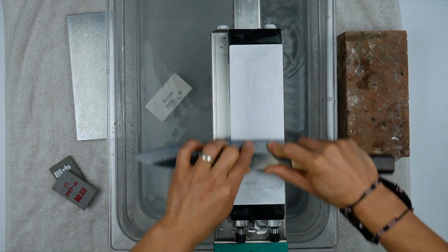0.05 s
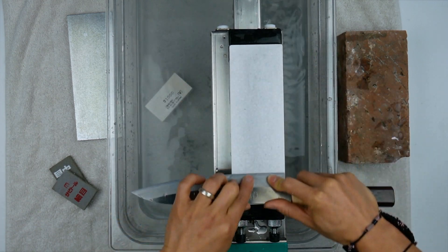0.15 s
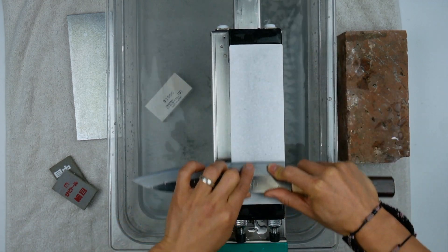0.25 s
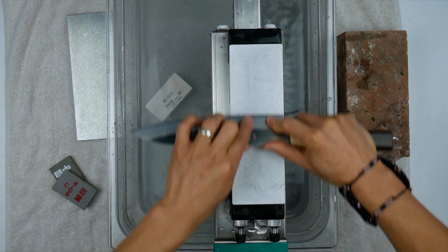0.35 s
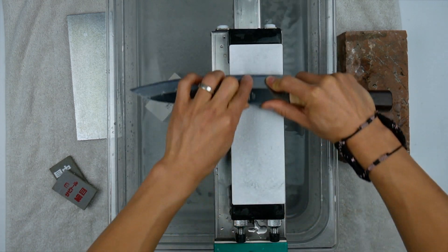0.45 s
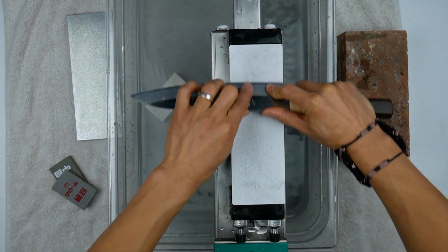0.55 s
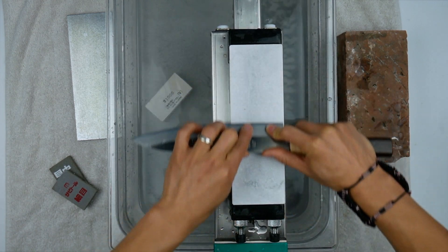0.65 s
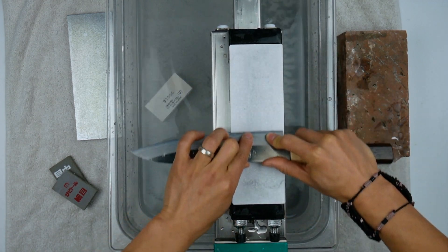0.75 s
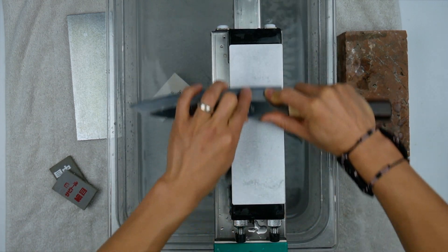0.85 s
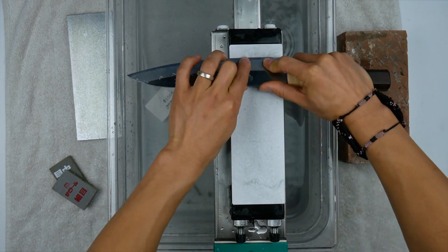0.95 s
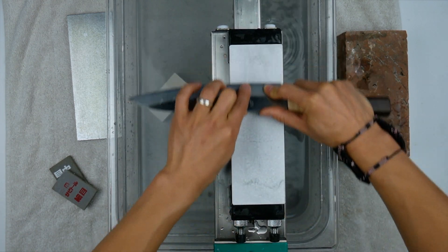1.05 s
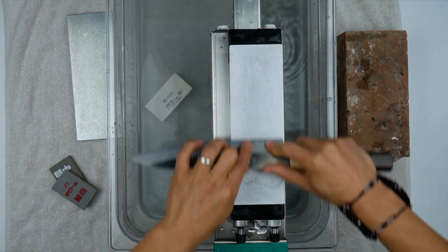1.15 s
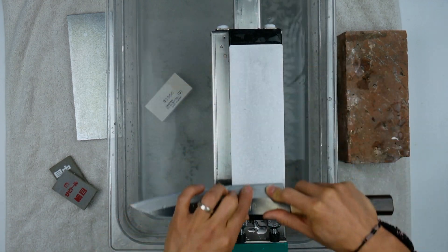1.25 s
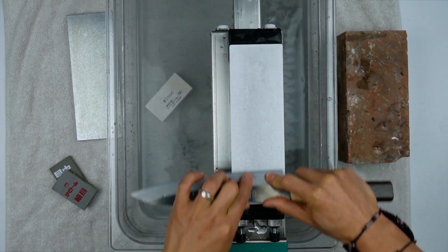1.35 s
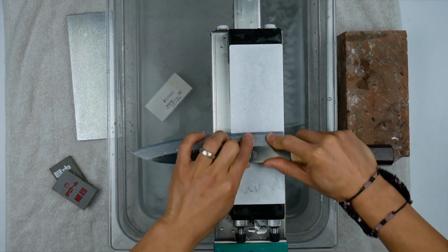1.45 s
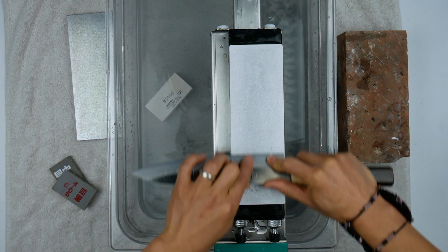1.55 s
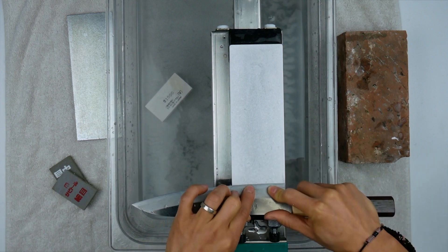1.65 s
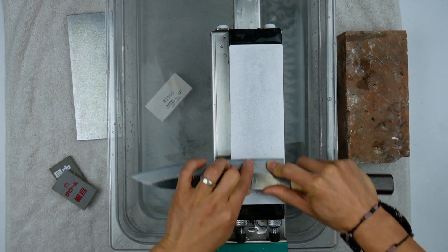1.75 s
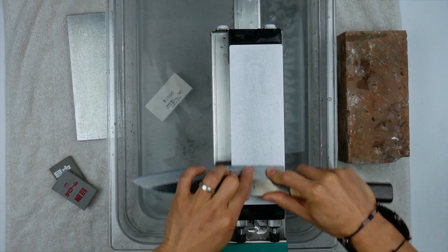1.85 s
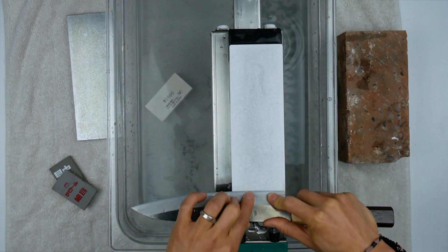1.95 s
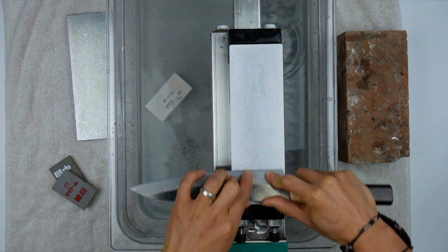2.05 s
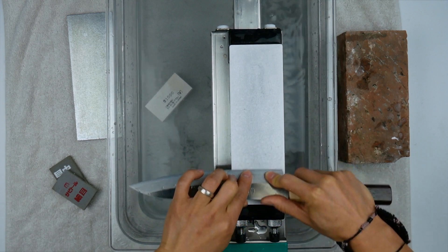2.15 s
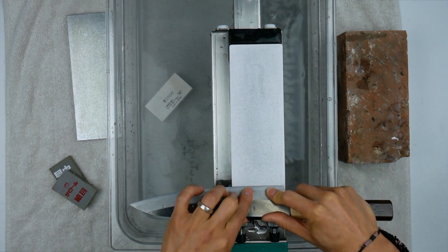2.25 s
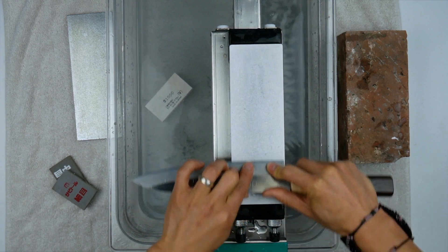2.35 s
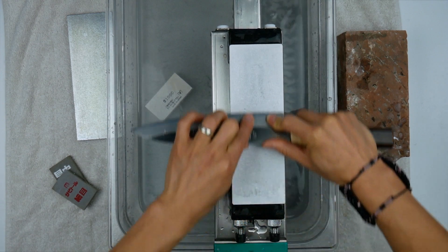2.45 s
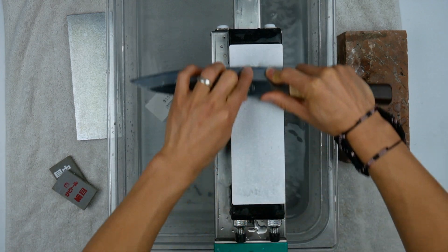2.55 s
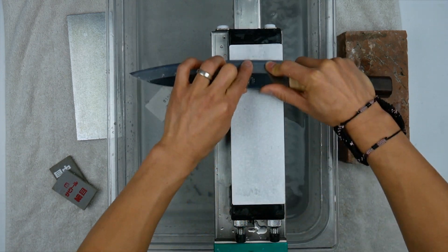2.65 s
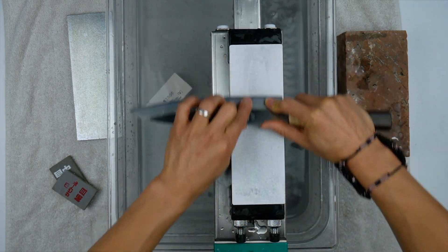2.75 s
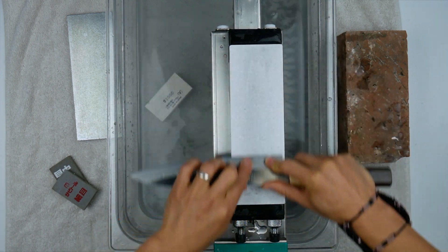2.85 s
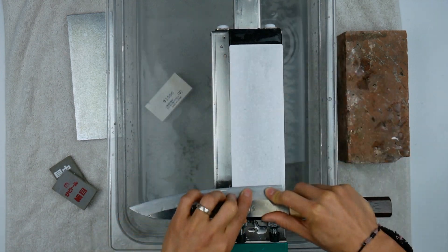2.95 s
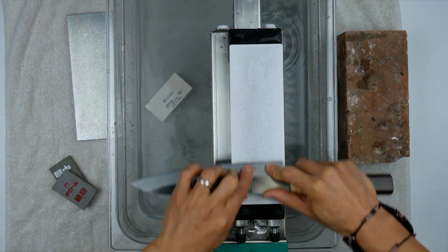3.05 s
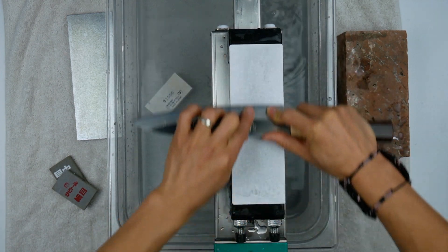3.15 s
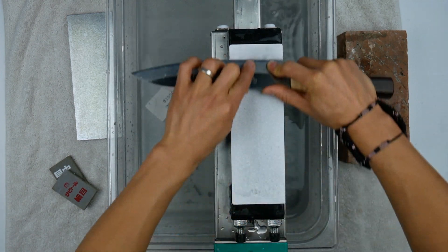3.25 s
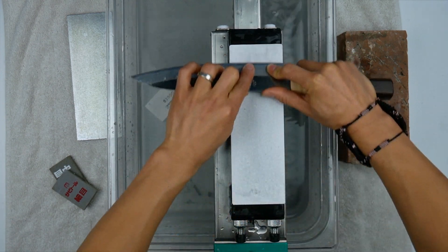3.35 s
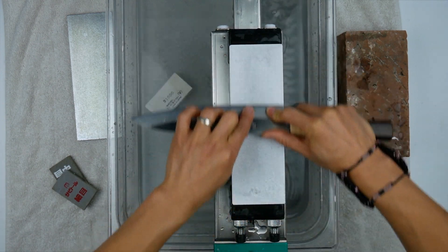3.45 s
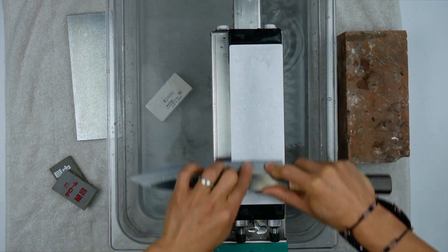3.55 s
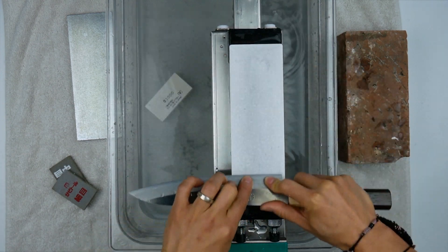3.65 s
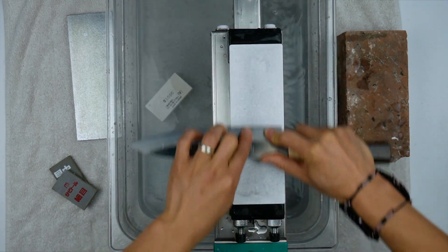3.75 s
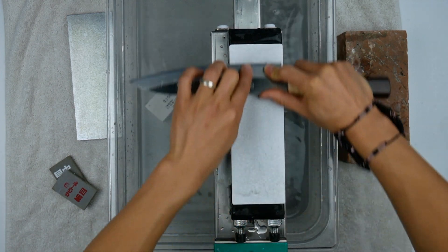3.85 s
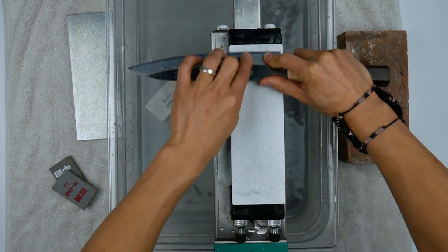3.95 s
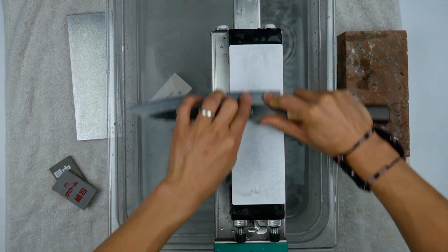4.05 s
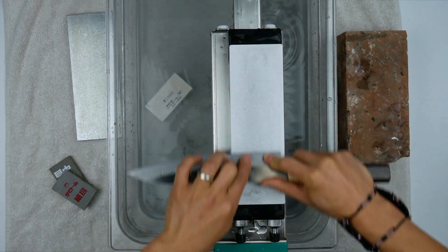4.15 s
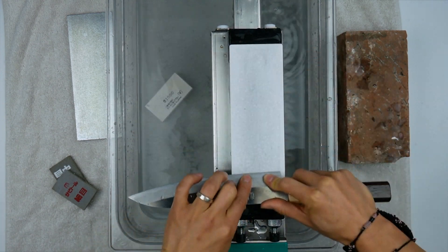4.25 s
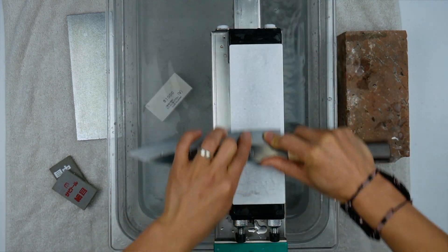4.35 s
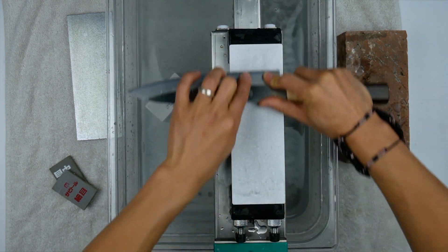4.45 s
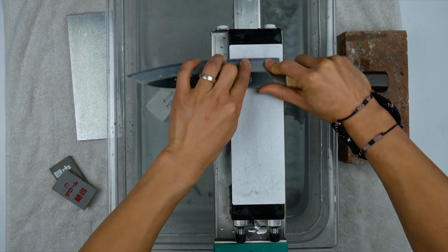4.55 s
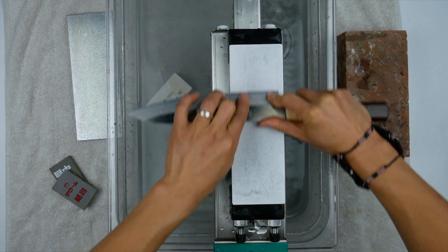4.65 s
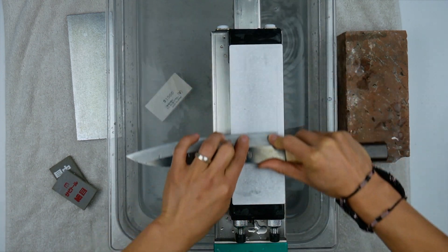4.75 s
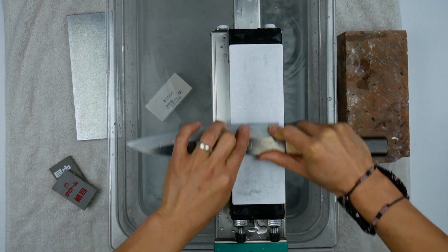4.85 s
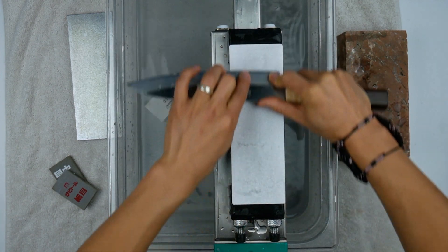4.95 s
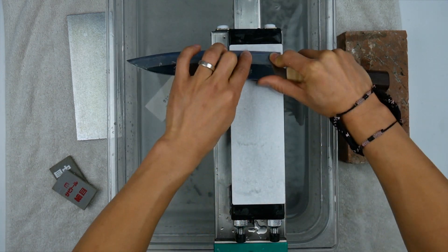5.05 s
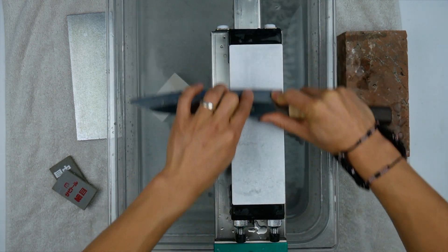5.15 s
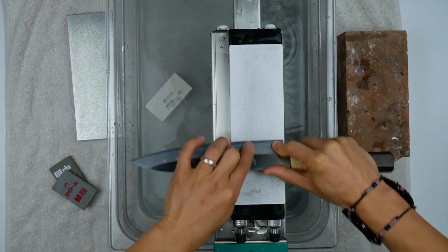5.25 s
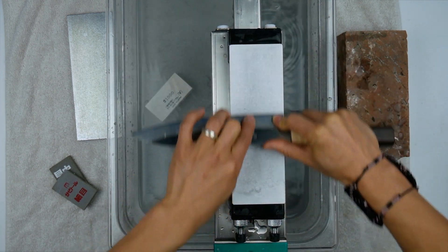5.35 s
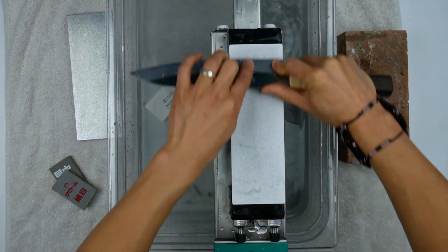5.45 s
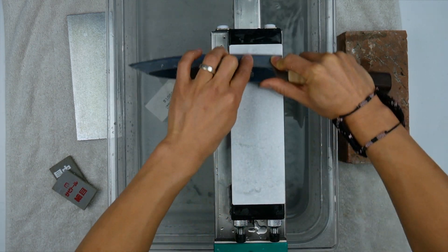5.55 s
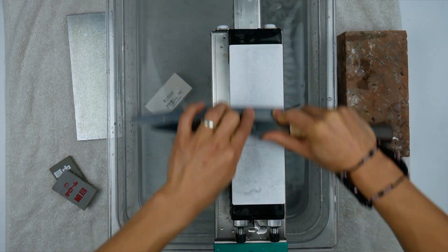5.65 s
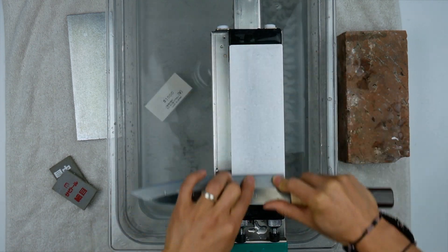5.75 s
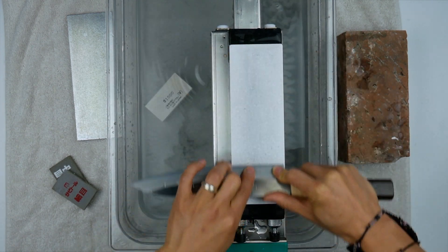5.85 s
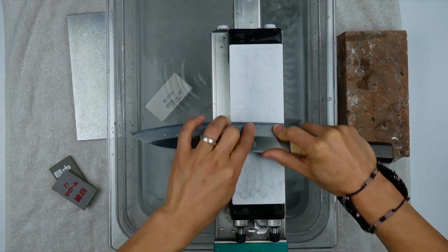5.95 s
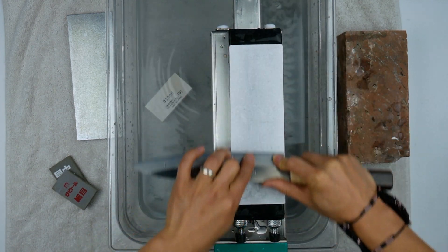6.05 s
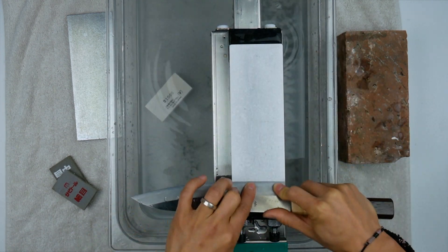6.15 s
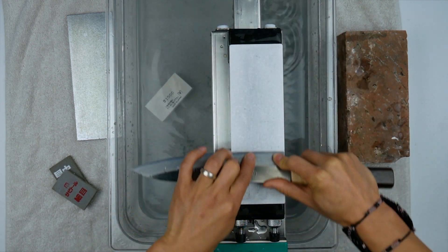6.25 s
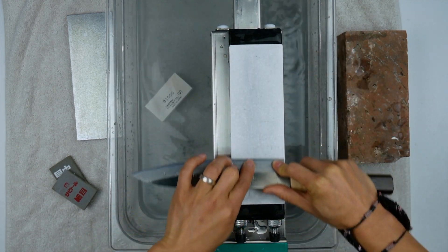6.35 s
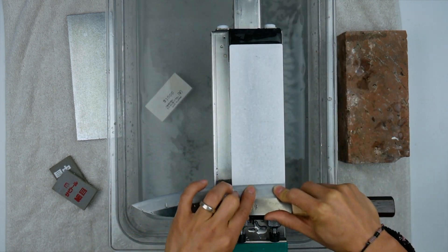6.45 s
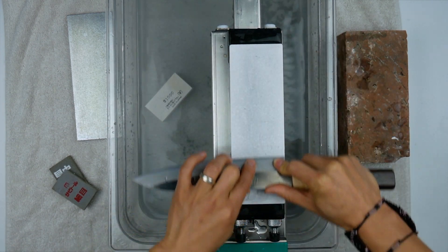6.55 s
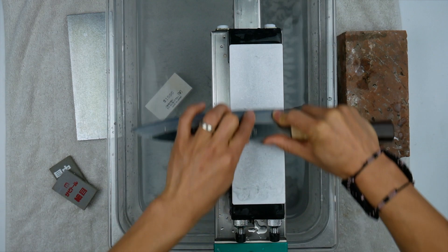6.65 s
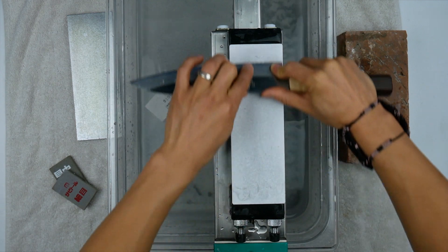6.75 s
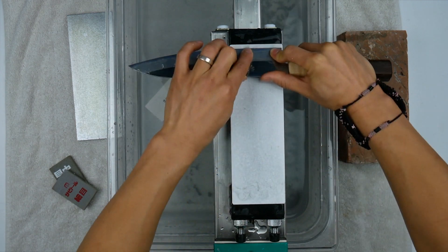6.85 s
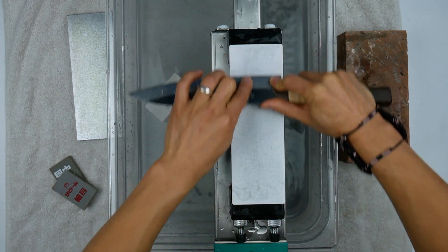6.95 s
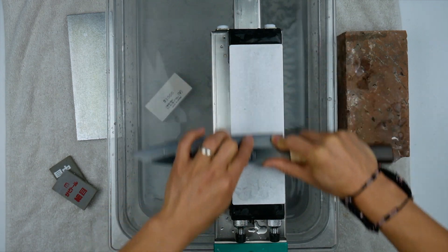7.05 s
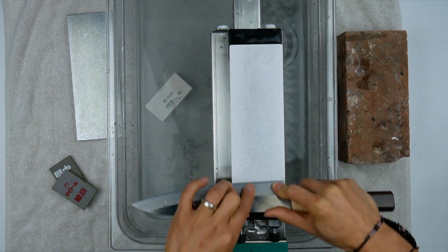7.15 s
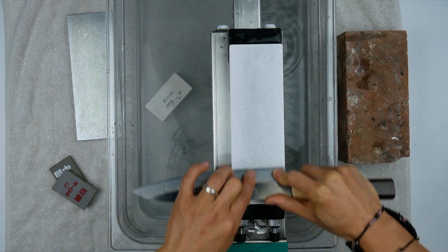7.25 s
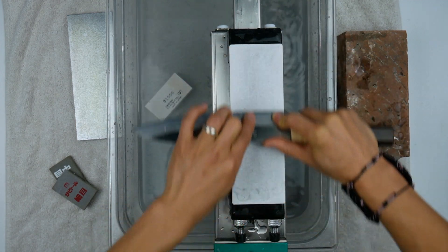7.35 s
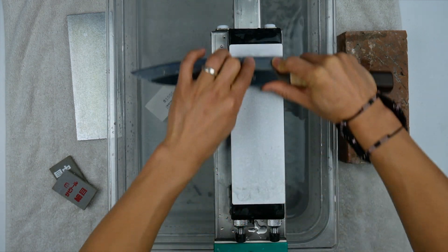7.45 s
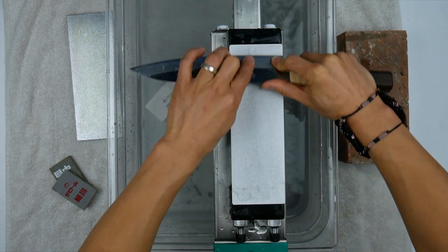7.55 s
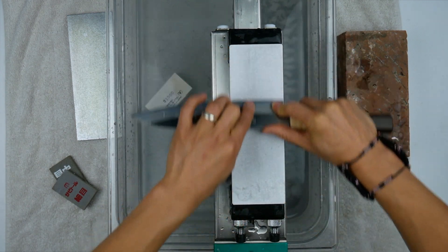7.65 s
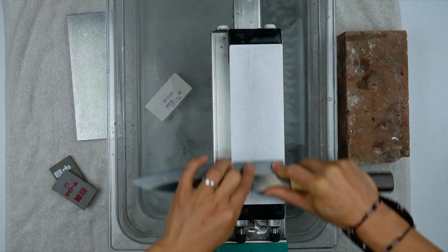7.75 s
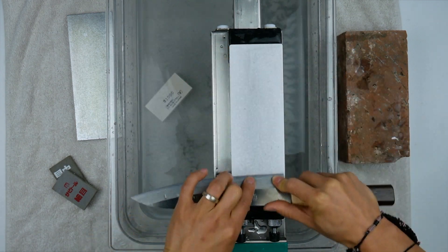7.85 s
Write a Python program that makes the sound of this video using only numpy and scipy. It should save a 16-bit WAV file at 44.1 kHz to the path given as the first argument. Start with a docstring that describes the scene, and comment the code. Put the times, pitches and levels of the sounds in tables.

```python
"""A steel blade rasps to and fro on a wet, coarse whetstone: the hiss swells with speed and almost stops at
each turn. Noise and single random grains stand for the grit; they ring the finger-damped knife through its
resonances. Bursts of noise make the edge catch and squeak, and a faint hollow note comes from the stone. Behind
it the stand rocks with dying tones, while the bench rumbles and water slops softly in a tub, both shaped noise.
A short room echo of the knife and faint air noise complete the sound, the same in both channels."""
import sys
import numpy as np
from scipy import signal
from scipy.fft import rfft, irfft, next_fast_len
from scipy.io import wavfile
from scipy.ndimage import uniform_filter1d, map_coordinates

SR = 44100
rng = np.random.default_rng(int(sys.argv[2]) if len(sys.argv) > 2 else 0)


def bounce(signal):
    """Save signal as a 16-bit WAV file at the path given by the first command-line argument."""
    frames = np.transpose(np.atleast_2d(signal))
    limited = np.clip(frames, -1, 1)
    pcm = np.round(limited * 32767).astype(np.int16)
    wavfile.write(sys.argv[1], SR, pcm)


N = 348820
TIME = np.arange(N) / SR
SIZE = next_fast_len(N + SR // 2, real=True) // 2 * 2  # even length for filtering, with room for tails
HZ = np.fft.rfftfreq(SIZE, 1 / SR)


# one row per stroke, from one turn of the hand to the next. Columns: start_s, start_place (0 near - 1 far),
# bite_db (relative), bite_gain_db (over the stroke), seat_moment (0-1 of the stroke, bevel fully seated),
# seat_bite_db (extra then), treble_db, seat_treble_db (extra then), ring_db (main mode of the blade)
STROKES = [(-0.09, 0.86, -32, 2.5, 0.78, 2, -1, 5, -4), (0.242, 0.19, -34, -3.5, 0.71, 6.4, 1.6, -1, -4),
           (0.562, 0.78, -36.5, -0.5, 0.6, 3.5, 2.2, -3, -2), (0.788, 0.35, -31.5, -9, 0.59, 3, 0, 2, 1.5),
           (1.032, 0.89, -31, -1, 0.87, 2.5, -0.3, 3, -6), (1.355, 0.076, -34.6, -2, 0.5, 1.4, 1, -2.5, -2),
           (1.545, 0.39, -36.5, -6, 0.52, 3.0, 2, 5, -2), (1.723, 0.15, -39.5, -16.5, 0.6, 2, 3, -4.1, 4),
           (1.869, 0.41, -38.5, -1, 0.6, 2, -0.5, 1.5, -0.5), (2.023, 0.11, -43, 2, 0.22, 2.5, -2, 2, -1),
           (2.177, 0.27, -43.8, -5, 0.62, 3.5, -3.5, 7, 5),
           (2.317, 0.086, -33, -2, 0.75, 0.5, 3.5, -0.3, -1.0),
           (2.698, 0.82, -35, -1.5, 0.54, 7.5, 5, 0.5, -2), (3.021, 0.13, -33.1, 0, 0.72, 8, 7, -4, -1),
           (3.379, 0.89, -29.5, -2.5, 0.38, 0.9, -0.3, 3.5, -4.5),
           (3.697, 0.24, -29, 10, 0.6, 2.5, 0, 8.5, 4), (4.001, 0.85, -28.5, -14, 0.66, 3, 2, 5, -1.5),
           (4.303, 0.1, -30, 10.5, 0.48, 3.5, 2, 0.5, 0.5),
           (4.605, 0.61, -31.5, -14.5, 0.72, 3.5, 2.8, -3.5, -1),
           (4.868, 0.34, -31, 3.5, 0.35, 5, 0.0, -1.5, 0.0), (5.114, 0.9, -25, 6, 0.57, -4, 4, 7.5, 0),
           (5.345, 0.35, -27, -6, 0.47, -2, 3, 7.5, 2), (5.594, 0.9, -28, 0, 0.73, 0.7, 6.5, 2, 1.5),
           (5.866, 0.12, -29.5, 0.5, 0.2, -2.7, 1.5, 2, 2.5),
           (6.045, 0.43, -34, -5, 0.45, 3.5, 4.5, 0, -3.5), (6.216, 0.1, -35, 0.5, 0.2, 1.8, -0.2, 4.1, -7),
           (6.373, 0.42, -38, -9, 0.56, 3, 2, 2, -9), (6.528, 0.083, -33, -5, 0.83, 7, 6, -5.5, -13),
           (6.918, 0.78, -31.9, -2.5, 0.81, 6.5, 5, -2.2, -3),
           (7.257, 0.074, -32.5, -10, 0.67, 8, 1.5, 3.5, 2),
           (7.589, 0.88, -31.5, 0.5, 0.51, 4, 4.5, 0.5, -6.5)]
# where the last stroke ends: time_s, place (0 near - 1 far)
LAST_TURN = (7.905, 0.204)


def hand():
    """The knife swings like a pendulum between turns: stroke number, progress, speed and place (all 0-1 but the first)."""
    s, place = np.transpose([row[:2] for row in STROKES] + [LAST_TURN])
    turns = np.arange(len(s))
    clock = np.interp(TIME, s, turns)
    stroke = np.minimum(clock.astype(int), len(STROKES) - 1)
    progress = clock - stroke
    speed = np.abs(np.sin(np.pi * progress))
    eased = stroke + (1 - np.cos(np.pi * progress)) / 2
    return stroke, progress, speed, np.interp(eased, turns, place)


def touch(stroke, progress, place, seat_width=0.24, ring_far_db=2, ring_most_db=4):
    """Bite, treble and ring (dB): pressure drifts in each stroke; where the bevel seats, bite and treble change."""
    bite, lean, moment, seat_bite, treble, seat_treble, ring = np.transpose(STROKES)[2:, stroke]
    seated = np.exp(-((progress - moment) / seat_width) ** 2)  # width as a share of the stroke
    bite_db = bite + lean * (progress - .5) + seat_bite * seated
    treble_db = treble + seat_treble * seated
    # the main mode sings more toward the far end, up to a fixed ceiling
    ring_db = np.minimum(ring + ring_far_db * (place - .5), ring_most_db)
    return uniform_filter1d(np.array([bite_db, treble_db, ring_db]), size=400)


def breakaway(stroke, progress, stick_s=0.011, stop_s=0.032, stick_db=-4.0, slip_db=3.5, settle_s=0.058):
    """Around each turn the edge sticks for an instant, then lets go with a small jerk."""
    starts = [row[0] for row in STROKES] + [LAST_TURN[0]]
    length = np.diff(starts)[stroke]
    since, until = progress * length, (1 - progress) * length  # seconds from the last turn and to the next
    stuck = (since < stick_s) | (until < stop_s)
    jerk_db = slip_db * np.exp(-np.minimum(since, until) / settle_s)
    return amp(uniform_filter1d(np.where(stuck, stick_db, jerk_db), size=400))


def grit(speed, grains_per_s=5000, coarse_share=0.26, chatter_db=0.06, drift_db=0.87):
    """Force on the edge: fine abrasion plus single grains, which come thicker at speed."""
    rate = grains_per_s * (0.053 + speed ** 2)
    hits = rng.random(N) < rate / SR
    grains = hits * rng.standard_normal(N) * np.sqrt(SR / rate)  # even power at any rate
    fine = rng.standard_normal(N)
    force = np.sqrt(coarse_share) * grains + np.sqrt(1 - coarse_share) * fine
    return force * amp(chatter_db * wobble(260) + drift_db * wobble(60))


# the edge catches on the stone or cracks a coarse grain. Columns: start_s, level_db (relative),
# t60_s (time to fall by 60 dB)
CATCHES = [(.584, -41, 0.089), (.813, -36, 0.072), (1.053, -41, .05), (1.561, -40.5, 0.054),
           (1.883, -47, 0.06), (2.046, -37.5, 0.031), (2.061, -31, 0.018), (2.08, -33, .014),
           (2.196, -43, 0.052), (2.248, -30, .015), (2.718, -42, .05), (3.392, -33, 0.12),
           (3.415, -34, 0.039), (3.676, -40, .015), (3.706, -38.5, .03), (4.017, -29, 0.11),
           (4.023, -22, .012), (4.322, -50, 0.048), (5.365, -42, 0.048), (5.608, -36, 0.051),
           (5.616, -28.5, 0.023), (6.318, -21, 0.011), (6.616, -25, 0.017), (6.933, -30.5, 0.11),
           (7.608, -45, 0.055), (7.29, -36, .02), (7.641, -26, 0.016)]


def catches():
    """Abrupt, short bursts of crushed grit: noise that dies away quickly."""
    force, t = np.zeros(N), np.arange(SR // 5) / SR
    for s, db, t60 in CATCHES:
        burst = amp(db - 60 * t / t60) * rng.standard_normal(len(t))
        add(force, s, burst)
    return force


# the grit's own noise. Columns: pitch_hz, level_db (per Hz, relative)
GRIT = [(150, -54), (700, -33.5), (1250, -20), (1700, -14), (2100, -1), (2700, -3), (4700, -1.25),
        (6800, -2), (10300, -4.5), (12500, -8.5), (15600, -14)]
# blade resonances. Columns: pitch_hz, width_hz, near_lift_db (near end of the stone),
# first_lift_db (farther out, first grip), second_lift_db (farther out, second grip)
BLADE = [(1496, 116, 14.5, 12, 11), (2354, 114, 6.5, 5.5, 9.8), (2986, 285, 14.5, 11.5, 2.9),
         (3184, 240, 5, 2.5, 10.4), (3650, 540, 9, 1, 0.43), (3900, 420, -0.5, 15, 14.2),
         (4430, 260, 5, 9, 11.5), (5100, 164, 3.5, 9.5, 11.6), (5390, 230, 1.5, 4, 9.7),
         (6377, 176, 13, 3.5, 0.37), (7380, 320, 1.5, 4.5, 3.1), (9930, 740, 1.5, 5, 5.3)]
# the fingers settle into a new hold. Columns: time_s, second_grip (share 0-1)
GRIP = [(0, 0.2), (4.0, 0), (4.7, 0.9)]
# the bevel lies flat, which damps the modes under a broad hiss. Columns: time_s, flat (share 0-1)
FLAT = [(3.7, 0.2), (3.88, 0.59), (4.04, 0.2), (4.16, 0.65), (4.48, 0.27), (4.72, 0.75), (4.98, 0.22),
        (5.15, 0)]


def blade(force, place, grip_hold=0.26, flat_hz=5400, flat_width=2800, flat_db=10, flat_ring=0.24,
          low_hz=2350, low_width=110, low_db=3):
    """The force rings the blade; where the edge rests and how it is held decide which modes speak."""
    grip, flat = curves(GRIP)[0], curves(FLAT)[0]
    far = np.clip((place - .2) / 0.43, 0, 1)
    far = far + grip_hold * grip * (1 - far)  # the second grip keeps some of its colour along the whole stone
    hz, width, *lifts = np.transpose(BLADE)
    near, first, second = [filtered(force, body(GRIT, zip(hz, width, db))) for db in lifts]
    ringing = (1 - far) * near + far * ((1 - grip) * first + grip * second)

    flat_modes = [(flat_hz, flat_width, flat_db), *zip(hz, width, flat_ring * lifts[-1])]
    damped = filtered(force, body(GRIT, flat_modes))
    mixed = (1 - flat) * ringing + flat * damped

    rasp = flex(wander(sliding_echo(mixed, place), depth_db=2.5, bins=5, frames=8))
    low_mode = filtered(rasp, bell(low_hz, low_width))  # freed by the second grip
    return rasp + grip * (amp(low_db) - 1) * low_mode


def sliding_echo(x, place, near_s=0.00111, far_s=0.001416, strength=0.14):
    """A faint echo of the blade follows it closely; its delay changes as the knife travels, so ripples glide
    through the rasp."""
    delay = near_s + (far_s - near_s) * place
    return x + strength * map_coordinates(x, [(TIME - delay) * SR])


def wander(x, depth_db, bins, frames):
    """A moving excitation favours now these, now those of a body's many overlapping modes."""
    z = signal.stft(x, nperseg=1024)[2]
    field = rng.standard_normal(z.shape)
    for axis, span in enumerate((bins, frames)):  # smooth over pitch, then over time
        field = uniform_filter1d(field, span, axis)
    gain = amp(depth_db * unit(field))
    return signal.istft(z * unit(gain), nperseg=1024)[1][:N]


def flex(x, knots_per_s=8, lag_s=.0005):
    """The blade bends under the fingers, which detunes its modes slightly: a small, wavering time shift."""
    lag = lag_s * wobble(knots_per_s)
    return map_coordinates(x, [(TIME - lag) * SR], order=5)


def bevel(rasp, treble_db, ring_db, split_hz=7000, main_hz=3930, main_width=200):
    """The lie of the bevel sets how sharp the hiss is and how much the main mode sings."""
    treble = filtered(rasp, 1 - 1 / (1 + (HZ / split_hz) ** 6))
    ring = filtered(rasp, bell(main_hz, main_width))
    return rasp + (amp(treble_db) - 1) * treble + (amp(ring_db) - 1) * ring


def gliding_mode(force, place, mid_hz=2290, end_drop_hz=470, width=170, from_place=.45,
                 near_level_db=-21.5, far_level_db=-14.5):
    """One mode of the blade sinks in pitch and speaks more as the knife nears the far end."""
    far = np.clip((place - from_place) / (1 - from_place), 0, 1)
    shape = bell(mid_hz, width)
    narrow = signal.hilbert(filtered(force, unit(shape)))
    shift = np.exp(-2j * np.pi * np.cumsum(end_drop_hz * far ** 1.5) / SR)  # lowers the pitch
    level_db = near_level_db + (far_level_db - near_level_db) * far
    return amp(level_db) * np.real(narrow * shift)


# the wet edge squeaks briefly. Columns: start_s, pitch_hz, width_hz, level_db, length_s
SQUEAKS = [(.97, 990, 149.7, -51, 0.029), (1.053, 1030, 150, -52, .04), (2.04, 4410, 714, -43.5, 0.016),
           (2.715, 1070, 149.2, -54, 0.074), (4.32, 3460, 300, -40.5, 0.023), (6.54, 3620, 252, -42.5, .05),
           (6.94, 4560, 910, -39, 0.031)]


def squeaks():
    """The wet edge squeaks: short swells of noise around one pitch."""
    return bursts(SQUEAKS)


def stone(speed, place, middle_hz=920, end_rise_hz=130, width=110, flutter_db=2.2, far_db=2):
    """A faint hollow note under the rasp that climbs as the knife nears the far end of the stone."""
    far = np.clip((place - .55) / 0.28, 0, 1) ** 2
    narrow = signal.hilbert(noise(bell(middle_hz, width)))
    shift = np.exp(2j * np.pi * np.cumsum(end_rise_hz * far) / SR)  # raises the pitch
    note = np.real(narrow * shift)
    return speed ** 0.28 * amp(far_db * far + flutter_db * wobble(30)) * note


def room(x, t60=0.19, size=4096):
    """Short diffuse room echo: a new random noise tail for each block."""
    t, out = np.arange(SR // 4) / SR, np.zeros(N)
    for start in range(0, N, size):
        tail = rng.standard_normal(len(t)) * amp(-60 * t / t60) * (t > .003)
        tail = tail / np.linalg.norm(tail)
        add(out, start / SR, signal.fftconvolve(x[start:start + size], tail))
    return out


# reversals shake the rig. Columns: time_s, stand_db (jolt, relative), bench_db (rumble), water_db (slop)
JOLTS = [(0.269, -53, -47, -56), (0.599, -51, -51, -56), (0.81, -53, -41.5, -61), (1.061, -48, -64, -61),
         (1.38, -57, -46, -50), (1.57, -49, -52, -59), (1.738, -57, -42.5, -52.5), (1.89, -50, -59, -59),
         (2.05, -63, -41.5, -51), (2.338, -51, -40.5, -50.5), (2.73, -47.5, -48, -65),
         (3.05, -56, -41.5, -47), (3.401, -49, -56, -56), (3.709, -50.5, -45, -55.5),
         (4.021, -47.5, -51, -49.5), (4.32, -60, -46.5, -56), (4.628, -48.5, -54, -55),
         (4.89, -45.5, -42.5, -53), (5.14, -52, -60, -67), (5.361, -54, -39, -53), (5.61, -49, -60, -62),
         (5.879, -49, -41.5, -51), (6.062, -47, -47, -59), (6.23, -55, -39.5, -49.5),
         (6.391, -48, -56, -56), (6.55, -59, -45, -47.5), (6.94, -50, -51, -61), (7.279, -72, -42.5, -51.5),
         (7.612, -51, -49, -58)]
# tones of the rocking stand. Columns: pitch_hz, level_db (relative), t60_s (time to fall by 60 dB)
STAND = [(59.3, 5, 0.33), (177, -8, 0.093)]


def stand(rise_s=0.012):
    """A reversal jolts the clamp, which rocks for a moment: dying low tones, a little different each time."""
    out, t = np.zeros(N), np.arange(SR // 2) / SR
    for s, db, _, _ in JOLTS:
        ring = np.zeros(len(t))
        for hz, level, t60 in STAND:
            louder, sharper = rng.standard_normal(2)
            tone = np.sin(2 * np.pi * hz * (1 + 0.029 * sharper) * t)
            ring += amp(level + 2 * louder - 60 * t / t60) * tone
        add(out, s, amp(db) * ring * (1 - np.exp(-t / rise_s)))
    return out


# noise of the bench. Columns: pitch_hz, level_db (per Hz, relative)
RUMBLE = [(8, -13.5), (20, 5), (32, -6.5), (45, -16.5), (65, -15), (95, -30.5), (300, -80)]


def bench(lag_s=0.0095, rise_s=0.041, fall_s=0.15, tremor_db=-56.5):
    """Just after a reversal the bench rumbles, over a steady tremor: low noise that swells and sinks."""
    s, _, rumble_db, _ = np.transpose(JOLTS)
    return swells(s + lag_s, rumble_db, rise_s, fall_s, tremor_db) * noise(amp(slope(RUMBLE)))


# noise of the slopping water. Columns: pitch_hz, level_db (per Hz, relative)
SLOP = [(60, -32), (130, -7.5), (300, -13), (600, -4.5), (900, -8.5), (1500, -4.5), (4000, -39)]
# resonances of the tub. Columns: pitch_hz, width_hz, lift_db
TUB = [(176.6, 46, 14), (411, 60, 12), (515.5, 18, 11), (607, 39, 9), (744, 81, 4.5)]
# short gulps of water, each around one pitch. Columns: start_s, pitch_hz, width_hz, level_db, length_s
GULPS = [(3.029, 599.4, 69.6, -44.5, 0.084), (4.745, 700, 900, -51, 0.097), (4.77, 212.5, 90, -53, 0.083),
         (6.546, 559, 119.8, -57, 0.078)]


def tub(lag_s=0.014, rise_s=.035, fall_s=0.055, ripple_db=-60.5):
    """Just after a reversal water slops against the tub, whose resonances colour it, over restless water."""
    s, _, _, slop_db = np.transpose(JOLTS)
    water = unit(wander(noise(body(SLOP, TUB)), depth_db=2.5, bins=3, frames=7))
    return swells(s + lag_s, slop_db, rise_s, fall_s, ripple_db) * water + bursts(GULPS)


# noise of the still air. Columns: pitch_hz, level_db (per Hz, relative)
AIR = [(20, -4), (60, 3), (110, -11.5), (500, -6.5), (1500, -52.5), (5000, -19), (16000, -19.5)]


def still_air():
    """A steady, faint background: random noise with a fixed colour."""
    return noise(amp(slope(AIR)))


def amp(db):
    """Decibels to gain."""
    return 10 ** (np.asarray(db) / 20)


def unit(x):
    """x at rms 1."""
    return x / np.sqrt(np.mean(x ** 2) + 1e-20)


def curves(rows):
    """One value per sample for each column after the time."""
    s, *cols = np.transpose(rows)
    return [np.interp(TIME, s, c) for c in cols]


def wobble(rate):
    """A smooth random curve, rate knots a second."""
    knots = rng.standard_normal(int(N * rate / SR) + 4)
    return map_coordinates(knots, [TIME * rate])


def slope(points):
    """(Hz, dB) points joined on a log axis."""
    f, db = np.transpose(points)
    return np.interp(np.log(HZ + 1), np.log(f), db)


def bell(hz, width):
    """Bell curve of one resonance, 1 at its top; the width is taken at half height."""
    return 1 / (1 + (2 * (HZ - hz) / width) ** 2)


def filtered(x, response):
    """x through a frequency response."""
    return irfft(rfft(x, SIZE) * response, SIZE)[:N]


def body(spectrum, modes):
    """Causal response of a smooth spectrum lifted by (Hz, width, dB) resonances."""
    level_db = slope(spectrum) + sum(db * bell(hz, width) for hz, width, db in modes)
    cepstrum = irfft(np.log(amp(level_db)))
    cepstrum[1:SIZE // 2] *= 2  # folding the cepstrum makes the response start at once (minimum phase)
    cepstrum[SIZE // 2 + 1:] = 0
    response = np.exp(rfft(cepstrum))
    return response / np.sqrt(np.mean(np.abs(response) ** 2))


def noise(response):
    """Coloured noise of rms 1."""
    return unit(filtered(rng.standard_normal(N), response))


def add(track, s, sound):
    """Mix a short sound in at time s."""
    part = track[max(round(s * SR), 0):][:len(sound)]
    part += sound[:len(part)]


def bursts(rows):
    """Short swells of narrow noise."""
    out = np.zeros(N)
    for s, hz, width, db, length in rows:
        swell = np.sin(np.pi * np.clip((TIME - s) / length, 0, 1))
        out += amp(db) * swell * noise(bell(hz, width))
    return out


def swells(times, levels_db, rise_s, fall_s, rest_db):
    """An envelope that rises to each level at its time and sinks back to rest; powers add up."""
    power = amp(rest_db) ** 2
    for s, db in zip(times, levels_db):
        distance = np.maximum((s - TIME) / rise_s, (TIME - s) / fall_s)
        power = power + amp(db) ** 2 * np.exp(-2 * distance)
    return np.sqrt(power)


def scene():
    """Knife, its room echo, stone note, rig and still air, the same in both channels."""
    stroke, progress, speed, place = hand()
    bite_db, treble_db, ring_db = touch(stroke, progress, place)
    bite = amp(bite_db)
    drive = bite * (0.008 + speed ** 1.23) * breakaway(stroke, progress)
    snaps = catches()
    force = amp(3.1) * drive * grit(speed) + amp(2.5) * snaps

    rasp = bevel(blade(force, place), treble_db, ring_db)
    crack = filtered(snaps, 1 - 1 / (1 + (HZ / 6000) ** 4))  # the bright crack of the grain itself
    knife = rasp + gliding_mode(force, place) + squeaks() + amp(-3) * crack

    note = amp(-54) * bite ** 0.22 * stone(speed, place)
    rig = stand() + bench() + tub()
    mono = knife + amp(-13.5) * room(knife) + note + rig + amp(-61.5) * still_air()
    return np.array([mono, mono])


def record(dry, top_hz=15900):
    """Keep only the sound below the band limit top_hz."""
    return np.array([filtered(channel, HZ < top_hz) for channel in dry])


dry = scene()
out = record(dry)
bounce(out)
```